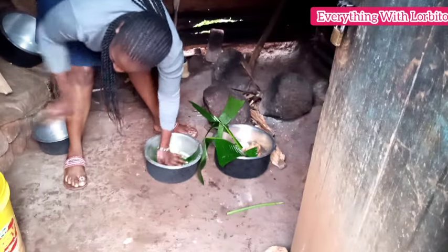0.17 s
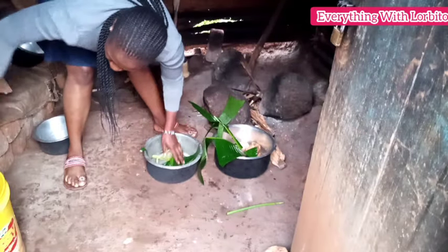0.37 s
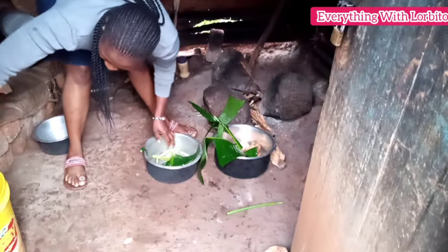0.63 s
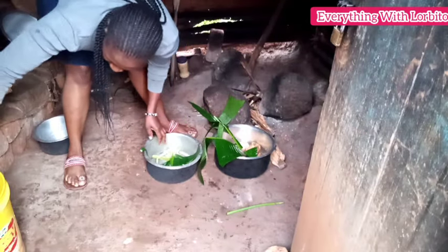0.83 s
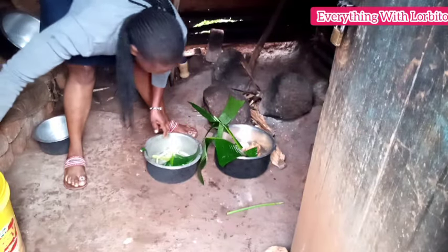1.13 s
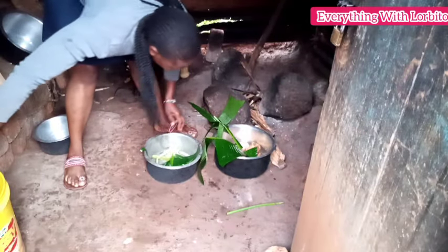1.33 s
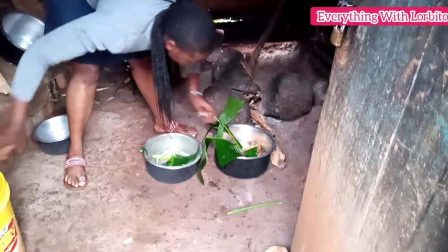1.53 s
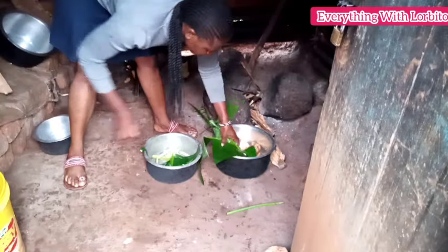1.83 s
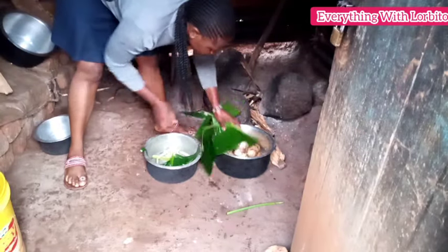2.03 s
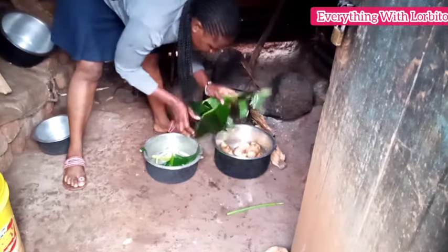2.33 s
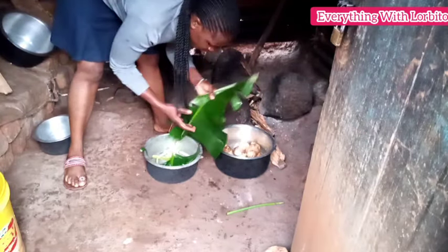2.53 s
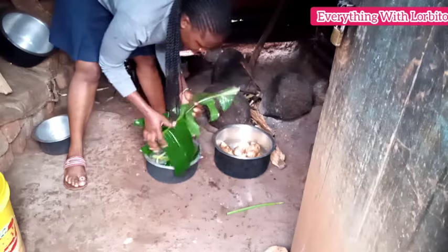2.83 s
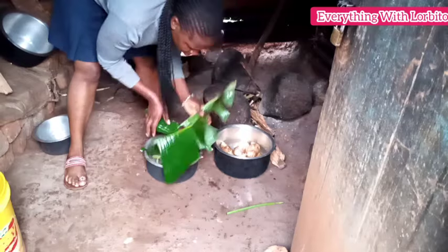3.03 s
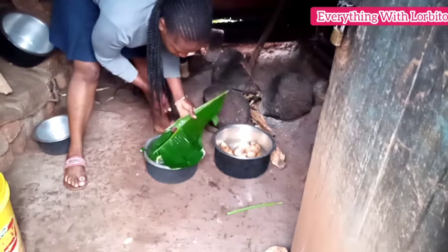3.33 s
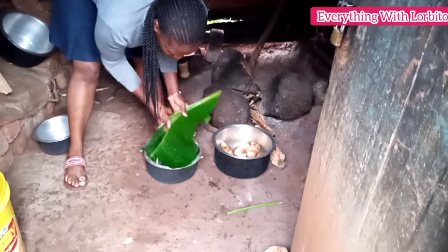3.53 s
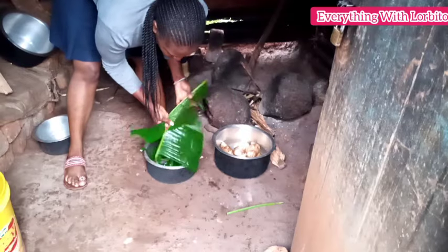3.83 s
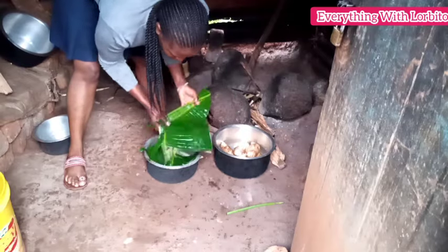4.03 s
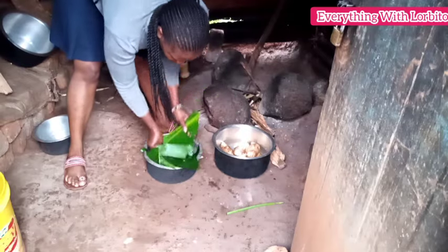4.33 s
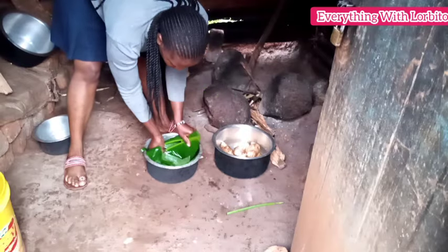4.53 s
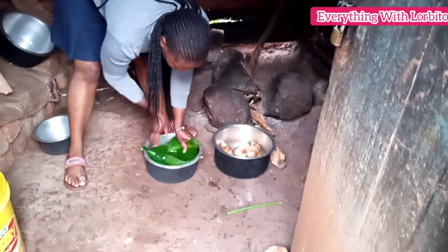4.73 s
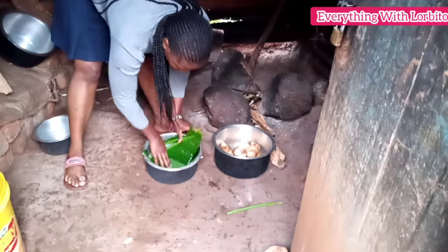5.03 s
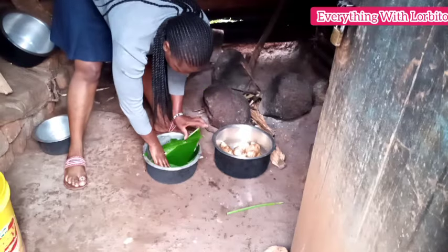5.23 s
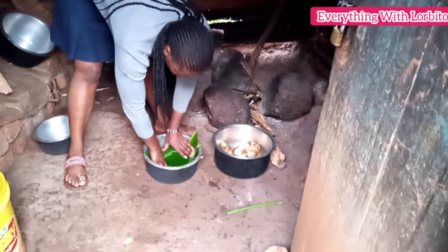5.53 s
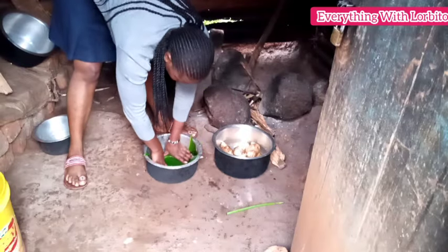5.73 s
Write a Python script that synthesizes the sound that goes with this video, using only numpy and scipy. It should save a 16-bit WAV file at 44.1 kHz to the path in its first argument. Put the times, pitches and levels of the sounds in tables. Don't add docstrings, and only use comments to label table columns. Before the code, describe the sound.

Leaves rustle sharply, a dish drags and clatters with damped, dull metal ringing, then knocks once more. Leaves swish while a bird outdoors gives about a dozen quick high chips over distant chatter. Gentle rubbing leads into leaves being pressed into a pot: crackles, snapping ribs and low pot thuds, densest and loudest at the end. Close phone pickup, short room tails, quiet air and low distant engine hum.

```python
import sys
import numpy as np
from scipy import signal
from scipy.fft import rfft, irfft
from scipy.io import wavfile
from scipy.ndimage import uniform_filter1d

SR = 44100
rng = np.random.default_rng(int(sys.argv[2]) if len(sys.argv) > 2 else 0)


def elevation(decibels):
    levels = np.asarray(decibels, float)
    return 10 ** (levels / 20)


def unload_audio(sound):
    columns = np.transpose(np.atleast_2d(sound))
    steps = np.round(np.clip(columns, -1, 1) * 32767)
    wavfile.write(sys.argv[1], SR, steps.astype(np.int16))


N = 259289


def unit(x):
    return x / np.sqrt(np.mean(x ** 2))


def noise():
    return rng.standard_normal(N)


def add(track, s, sound):
    i = max(int(s * SR), 0)
    track[i:i + len(sound)] += sound[:N - i]


def band(x, edges_hz):
    return signal.sosfilt(signal.butter(2, edges_hz, "band", fs=SR, output="sos"), x)


def ring(x, hz, width_hz):
    return signal.lfilter(*signal.iirpeak(hz, hz / width_hz, fs=SR), x)


def colour(x, points):
    hz, db = np.transpose(points)
    grid_hz = np.maximum(np.arange(1025) * SR / 2048, 1)
    cepstrum = irfft(np.interp(np.log(grid_hz), np.log(hz), db) * np.log(10) / 20)
    cepstrum[1:1024] *= 2
    cepstrum[1025:] = 0
    return signal.fftconvolve(x, irfft(np.exp(rfft(cepstrum))))[:len(x)]


def walk(rate_hz):
    hold = int(SR / rate_hz)
    steps = np.repeat(rng.standard_normal(N // hold + 1), hold)
    return unit(uniform_filter1d(uniform_filter1d(steps, hold), hold)[:N])


def strokes(rows, attack_s, release_s, lean=0.):
    t, power = np.arange(N) / SR, 1e-16
    for s, length, db, swell_db, *depth in rows:
        level_db = db + swell_db * np.clip((t - s) / length, 0, 1) + lean * sum(depth)
        level_db -= 60 * (np.maximum(s - t, 0) / attack_s + np.maximum(t - s - length, 0) / release_s)
        power = power + elevation(2 * level_db)
    return np.sqrt(power)


def mottle(x, depth_db=2.2):
    spec = signal.stft(x, nperseg=256)[2]
    field = rng.standard_normal(spec.shape)
    for _ in range(2):
        field = uniform_filter1d(uniform_filter1d(field, size=2, axis=0), size=12, axis=1)
    return signal.istft(spec * elevation(depth_db * unit(field)), nperseg=256)[1][:N]


HUT_T60_S = [0.3, 0.24, 0.28, 0.19]


def echo(wet_db, slow=0.83):
    t = np.arange(int(SR * .35 * slow)) / SR
    edges_hz = [(60, 675), (675, 1650), (1650, 7750), (7750, 20000)]
    spread_db = 3.4 * np.exp(-t / 0.023)
    sparse = elevation(spread_db * np.minimum(rng.exponential(size=len(t)), 3.5))
    tail = np.zeros(len(t))
    for edges, t60 in zip(edges_hz, HUT_T60_S):
        tail += band(sparse * rng.standard_normal(len(t)), edges) * 1000. ** (-t / (slow * t60))
    tail *= 1 - np.exp(-t / 0.00067)
    tail *= elevation(wet_db) / np.sqrt(np.sum(tail ** 2))
    tail[0] += 1
    return tail


def hut(x, wet_db, slow=0.86):
    return signal.fftconvolve(x, echo(wet_db, slow))[:N]


# (frequency [Hz], density [dB per Hz])
AIR = [(32, -46), (55, 5.5), (135, 2.5), (316, -5.5), (631, -13.5), (934, -0.5), (1380, -15), (5000, -19),
       (13500, -32)]


def still_air():
    rumble = elevation(1.8 * walk(8)) * band(noise(), (20, 300))
    air = colour(rumble + band(noise(), (300, 20000)), AIR)
    return elevation(-72.5) * mottle(unit(air), depth_db=3.0)


HUM_HZ = (130, 149.5)
# (start [s], length [s], level [dB], swell [dB], lean to upper tone [dB])
HUM_SWELLS = [(0.0, 0.05, -62, -4, 1.5), (.35, 0.22, -72.5, -2, 3), (.68, 0.044, -54.5, -8, 4.5),
              (.85, 0.33, -86, -2, -7), (1.25, 0.059, -77, -1, -3), (1.48, 0.041, -73, 0.5, -2),
              (1.66, 0.29, -67, 1, 1), (2.0, 0.23, -75.5, 4, -1), (2.33, 0.076, -74, 0.5, -5),
              (2.82, 0.19, -69, 3, -0.5), (3.12, 0.17, -67, 0, -1.5), (3.6, 0.072, -75, 0, 0),
              (4.08, 0.12, -76.5, -3, -5.5), (4.3, 0.16, -73.5, 0, 3), (4.63, 0.12, -78.5, 2.5, 4.5),
              (4.86, 0.19, -72.5, 0.5, 6.5), (5.16, 0.66, -71, 5.5, 4)]


def motor():
    hum = np.zeros(N)
    for hz, lean in zip(HUM_HZ, (-1, 1)):
        level = strokes(HUM_SWELLS, 0.13, .4, lean) * elevation(-1.6 + 2.85 * walk(22))
        hum += level * np.sin(2 * np.pi * np.cumsum(hz * (1 + 0.044 * walk(30))) / SR)
    return hum


# (start [s], length [s], level [dB], swell [dB])
LOW_CHATTER = [
    (1.95, 0.68, -64, -9.5),
]
# (start [s], length [s], level [dB], swell [dB])
HIGH_CHATTER = [
    (1.2, 0.66, -83, 4.5),
    (1.95, 0.725, -72, 12),
    (2.68, 0.74, -72.5, 3),
    (3.3, .6, -83.5, 12),
]


def chatter():
    low = unit(ring(noise(), 2910, 310)) * elevation(-7 + 6.7 * walk(29.76))
    high = unit(band(noise(), (3200, 5900))) * elevation(-9.5 + 2.6 * walk(39.93))
    return low * strokes(LOW_CHATTER, .1, .4) + high * strokes(HIGH_CHATTER, .1, 0.44)


# (start [Hz], end [Hz])
CHIP_HZ = (5440, 3490)
# (time [s], peak level [dB], length [s])
CHIPS = [(2.06, -56.5, 0.012), (2.144, -52, .011), (2.21, -60, 0.025), (2.24, -51.5, .011),
         (2.329, -50.5, 0.0083), (2.419, -50.5, 0.009), (2.526, -52, .013), (2.621, -54, 0.013),
         (2.694, -51.5, 0.0121), (2.7255, -48, .014), (2.736, -57, 0.017), (2.826, -63, 0.017),
         (2.905, -71, 0.011)]


def bird():
    track, (start_hz, end_hz) = np.zeros(N), CHIP_HZ
    for s, db, length in CHIPS:
        u = np.linspace(0, 1, int(length * SR))
        hz = end_hz + (start_hz - end_hz) * (1 - u) ** 1.62
        phase = 2 * np.pi * np.cumsum(hz) / SR
        add(track, s - .002, elevation(db - 5.5) * np.sin(np.pi * u) * np.sin(phase))
    return hut(track, -2, slow=2.2)


# (time [s], level [dB], pitch [Hz], length [s])
BUMPS = [(0.404, -77, 420, 0.4), (1.4, -64.5, 820, 0.032), (1.463, -81, 432, 0.076), (2.3, -79, 510, 0.1),
         (2.469, -75, 1840, 0.049), (2.769, -69, 243, 0.1), (2.9, -72, 913, 0.2), (2.942, -68.5, 220, 0.1),
         (3.135, -69.5, 436, 0.1), (3.12, -69, 865, 0.16), (3.142, -68.5, 2370, 0.16),
         (3.333, -72.5, 431, 0.17), (3.582, -70.5, 436, 0.071), (4.381, -60.5, 387, 0.047),
         (4.899, -66, 1250, .14), (4.96, -61, 863, 0.1), (5.27, -56.5, 373, 0.023), (5.44, -60, 394, 0.063),
         (5.58, -54.5, 404, 0.057), (5.599, -57, 595, .06)]


def bumps():
    track, settle = np.zeros(N), 4000
    for s, db, hz, length in BUMPS:
        u = np.linspace(0, 1, int(length * SR))
        stir = rng.standard_normal(len(u) + settle)
        mode = unit(ring(ring(stir, hz, hz / 6), hz, hz / 6)[settle:])
        add(track, s, elevation(db + 0.5) * np.sin(np.pi * u ** 0.56) ** 2 * mode)
    return hut(track, -0.6)


# (start [s], length [s], level [dB], swell [dB])
DRAG = [
    (.44, 0.118, -79.5, 9),
    (.56, 0.093, -68.5, 4),
    (.82, 0.091, -81, -2),
]
# (frequency [Hz], width [Hz], level [dB])
DRAG_RINGS = [(1820, 66, -2), (2450, 34, 0), (3720, 47, -3.5), (4500, 79, -7), (5230, 66, -9),
              (6800, 49, -13), (8750, 48, -12.5)]


def dish_drag():
    rim = sum(elevation(db) * ring(noise(), hz, width) for hz, width, db in DRAG_RINGS)
    squeak = strokes([(.44, 0.076, -71, -4)], .05, 0.18) * unit(ring(noise(), 7000, 300))
    return squeak + strokes(DRAG, .05, .1) * mottle(unit(rim))


# (frequency [Hz], width [Hz], level [dB])
DISH = [(360.6, 33, 0), (420, 41, 2), (580, 99, -5.5), (773, 36, -5), (827, 45, 7), (952, 51, -0.5),
        (1053, 200, 1.5), (1382, 73, 0.5), (1640, 70, -8.5), (1980, 100, -5.5)]
# (time [s], peak level [dB], low ring [dB], crack [dB])
KNOCKS = [
    (0.646, -22, -14, 3),
    (0.661, -22.5, -2.5, -25),
    (0.683, -27, 0, -4.5),
    (0.705, -33.5, 3.5, -11),
    (0.75, -40, -10, -0.5),
    (0.761, -36, -5.5, -32),
    (0.92, -43.5, 6, -26),
    (1.157, -31.5, -7, -3),
    (1.169, -37.5, -6.5, -30),
]


def dish_knocks():
    track = np.zeros(N)
    for s, db, low_db, crack_db in KNOCKS:
        blow = echo(12, slow=0.73)
        rings = np.zeros(len(blow))
        for hz, width, mode_db in DISH:
            mode = ring(ring(blow, hz, width), hz, 8 * width) / np.sqrt(width)
            rings += elevation(mode_db + low_db * (hz < 500)) * mode
        click = band(colour(blow, LEAF), (1200, 8500))
        crack = elevation(crack_db - 3.0) * click / np.abs(click).max()
        add(track, s, elevation(db) * (elevation(40.5) * rings + crack))
    return track


# (frequency [Hz], level [dB])
POT = [(150, -14), (390, -4.5), (600, 5), (880, 1), (1100, 0.5), (1500, 1.5), (2500, -6)]
# (frequency [Hz], level [dB])
LEAF = [(1200, -7.5), (2000, 2.5), (3500, 0.5), (6400, 1), (9000, -2), (10800, -1.5), (13000, -9.5),
        (16500, -9.5)]
# (low edge [Hz], high edge [Hz])
BANDS_HZ = [
    (270, 620),
    (680, 2300),
    (2200, 9500),
    (8500, 16500),
]


def layers(x):
    dull, bright = colour(x, POT), colour(x, LEAF)
    return [band(v, edges) for v, edges in zip((dull, dull, bright, bright), BANDS_HZ)]


# (start [s], length [s], level [dB], swell over the stroke [dB], depth [dB])
WAVES = [(0.0, 0.025, -40.5, -3.5, -6.5), (.11, 0.062, -62.5, 3.5, -2), (.2, 0.11, -62, -12.5, 1.5),
         (.55, 0.065, -74, -8, 7), (.86, 0.089, -77.5, 0.5, 2.5), (1.45, 0.38, -97.5, 7, 5),
         (1.775, .05, -61.5, 6, -3), (1.83, 0.11, -53.5, -9, -4), (1.95, 0.26, -61.5, -6, -4),
         (2.33, 0.018, -76, -4, -20), (2.45, 0.18, -70, 7, -8.5), (2.75, 0.14, -84.5, 2, 7.5),
         (2.91, 0.094, -80, 1, 3.5), (3.11, .16, -64, -4.5, 3), (3.33, 0.24, -81, -16, 10),
         (3.59, 0.1, -69, -3.5, 1), (3.74, 0.14, -73.5, 2, -2), (3.91, 0.078, -65, 0.5, 0.5),
         (4.02, 0.047, -62, 1.5, 0), (4.1, 0.17, -68, -1, -4)]
# (start [s], length [s], level [dB], swell over the stroke [dB], depth [dB])
PRESSES = [(4.28, 0.14, -72, 8.5, 3), (4.447, 0.046, -57.5, -1, -2), (4.547, 0.21, -62.5, -0.5, -2),
           (4.764, 0.23, -69.5, -0.5, -1), (4.914, .045, -62.5, -0.5, 1), (4.98, .2, -57.5, -6, 0.5),
           (5.215, 0.25, -65.5, 1, 0), (5.388, 0.18, -57, 3, -14), (5.59, 0.157, -52, 4.5, -8.5),
           (5.781, 0.041, -39, 6.5, -5.5), (5.816, 0.038, -38, 6, -4), (5.865, .03, -40, -1, -6)]


def swish():
    creases_per_s = 1100
    size = elevation(5.5 * np.minimum(rng.exponential(size=N), 3.3))
    creases = (rng.random(N) < creases_per_s / SR) * size * rng.choice([-1, 1], N)
    rub = hut(unit(creases), 1.5) + elevation(-1.0) * noise()
    hand_db = .9 * walk(30)
    shares_db, flickers_db = (-8.5, -2, 1.5, -10), (2.5, 1.5, .7, .7)
    leans = (1.55, 0.88, 0.13, -0.37)
    efforts = [strokes(WAVES + PRESSES, 0.091, 0.22, lean) for lean in leans]
    efforts[3] = efforts[3] * np.minimum(efforts[3] / elevation(-60), 1) ** 0.1676
    track = np.zeros(N)
    for layer, effort, share_db, flicker_db in zip(layers(rub), efforts, shares_db, flickers_db):
        track += unit(layer) * effort * elevation(share_db + hand_db + flicker_db * walk(22.07))
    return track


# (time
# [s], peak level [dB], depth [dB], sheen [dB])
CRACKS = [(0.0004, -25.5, -13.5, -32), (0.0175, -28, -17, -20), (0.1148, -50, -16, -19),
          (0.1363, -41.5, -15, -38), (0.353, -53.5, -7.5, -41), (0.459, -53, -11.5, -21),
          (0.879, -70, -21, -30), (1.8537, -50, -26, 1), (1.9027, -25, -18.5, -14), (1.917, -52, -2, -13),
          (2.962, -64.5, -7, 2), (4.0232, -50, -21, -10), (4.1007, -45.5, -19, -28),
          (4.1561, -26.5, -20.5, -15), (4.2178, -32, -9.5, -14), (4.235, -51, 3, -16),
          (4.4738, -46.5, -8, -4), (4.5148, -24, -19.5, -14), (4.594, -53, -17, -1),
          (4.6368, -32.5, -17, -32), (4.6583, -36.5, -13.5, -8), (4.7047, -40.5, -25, -39),
          (4.9648, -21.5, -23, -17), (5.0707, -24, -27, -13.5), (5.1156, -29.5, -21.5, -14),
        (5.1456, -27, -28, -20), (5.214, -30, -24, -11), (5.3053, -24, -17.5, -10),
        (5.3829, -25, -18.5, -11.5), (5.421, -36.5, -24, -22), (5.4542, -46, -10, -8),
        (5.481, -34.5, -16, -27), (5.5095, -29, -13, -24), (5.5678, -35.5, -15.5, -22),
        (5.6008, -33, -14.5, -23), (5.6349, -37.5, -11.5, -24), (5.6592, -27.5, -20, -31),
        (5.7352, -27, -18.5, -25), (5.7643, -17, -30, -30), (5.7842, -24, -13.5, -20),
        (5.8088, -18, -9, -22), (5.8243, -22, -3, -16), (5.8544, -28, -7, -24)]


def snaps():
    track = np.zeros(N)
    trims_db = (4, 4, -1.5, 1.5)
    for s, db, depth_db, sheen_db in CRACKS:
        click = echo(3 - 0.1563 * db)
        thud_db = -4 + 1.42 * depth_db
        weights_db = (thud_db, depth_db, 0, sheen_db)
        for layer, weight_db, trim_db in zip(layers(click), weights_db, trims_db):
            add(track, s, layer / np.abs(layer).max() * elevation(db + weight_db + trim_db))
    return track


def scene():
    outside = still_air() + motor() + chatter() + bird()
    floor = bumps() + dish_drag() + dish_knocks()
    return (outside + floor + mottle(swish() + snaps()))[None]


# (frequency [Hz], gain [dB])
MIC = [(13500, 0), (14300, 5), (15000, 9), (15550, 8), (15800, -20), (16500, -30)]


def phone_microphone(x):
    ceiling = .2
    heard = colour(signal.sosfilt(signal.butter(2, 55, "high", fs=SR, output="sos"), x), MIC)
    return ceiling * np.tanh(heard / ceiling)


def low_pass(x):
    return signal.sosfilt(signal.butter(12, 16830, fs=SR, output="sos"), x)


def record(dry):
    mix = phone_microphone(dry[0])[None]
    return low_pass(mix)


dry = scene()
out = record(dry)
unload_audio(out)
```